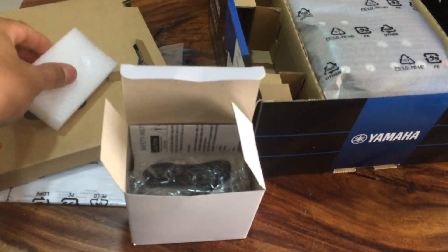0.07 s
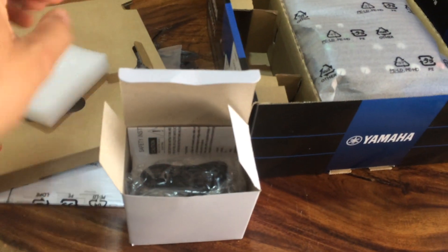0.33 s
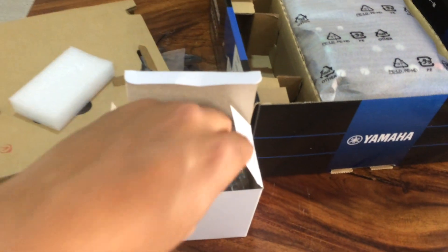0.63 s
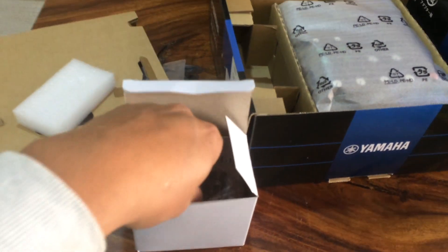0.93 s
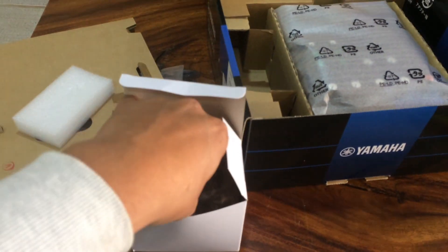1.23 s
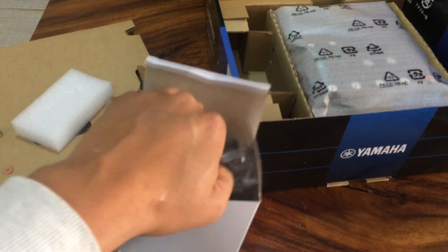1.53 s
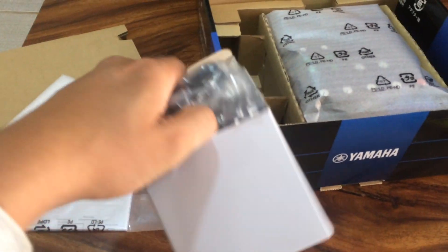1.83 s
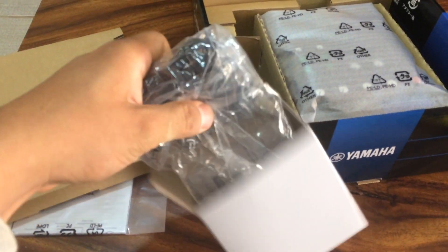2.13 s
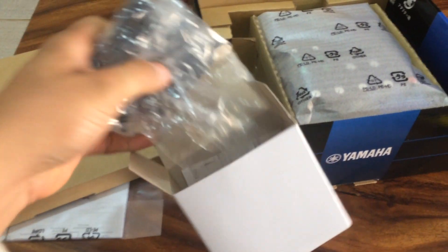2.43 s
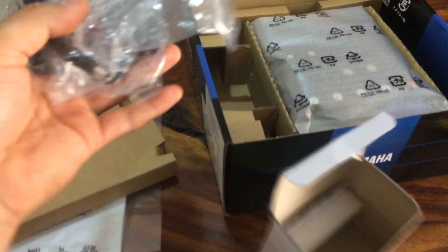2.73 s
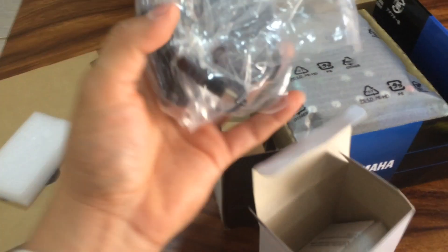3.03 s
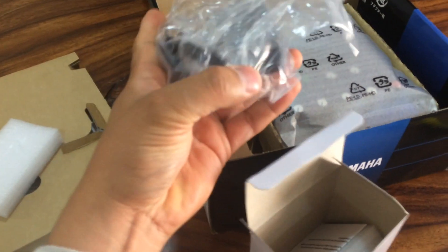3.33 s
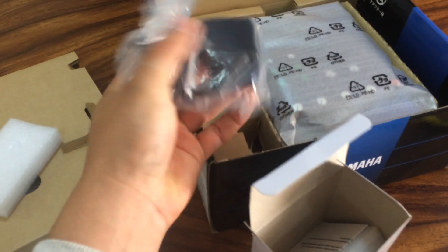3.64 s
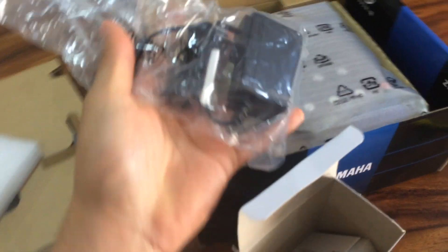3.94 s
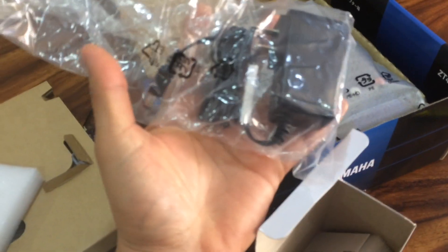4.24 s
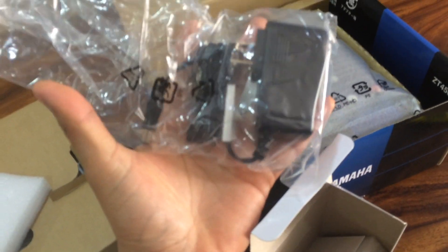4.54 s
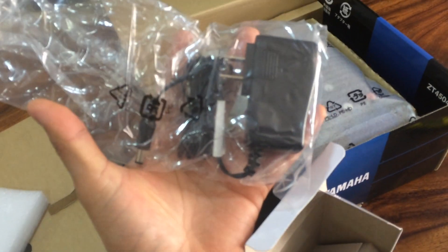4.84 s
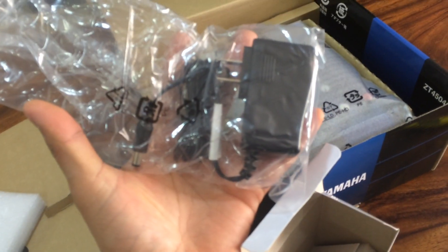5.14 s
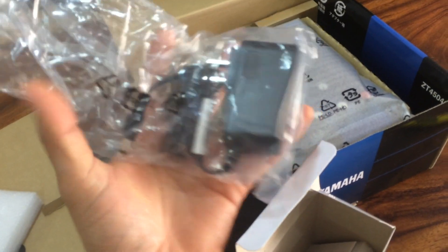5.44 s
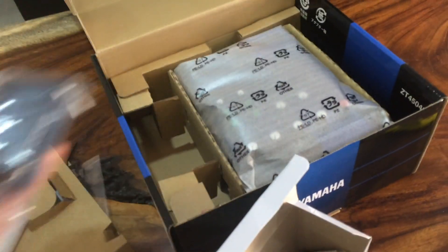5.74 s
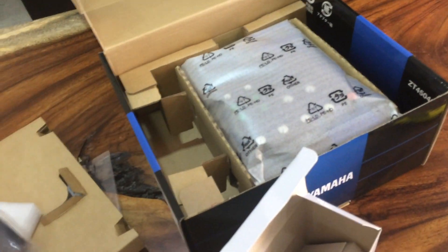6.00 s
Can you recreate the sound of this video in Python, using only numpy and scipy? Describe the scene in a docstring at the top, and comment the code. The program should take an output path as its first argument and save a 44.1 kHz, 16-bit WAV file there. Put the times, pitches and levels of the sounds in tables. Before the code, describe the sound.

Thin plastic crinkles and scrapes out of a cardboard box, the box drops on a table, and the bag crackles in a hand.

```python
"""In a small, quiet room, close to the microphone, a hand pulls a power adapter in a plastic bag out of
a cardboard box. A foam pad hisses through the fingers and the bag rubs along the card by stick-slip
friction. The empty box drops on a wooden table and bounces, each impact exciting the modes of its panels.
The bag is turned over in the palm: its creases buckle, so that the film snaps and crinkles."""
import sys
import numpy as np
from scipy import signal
from scipy.fft import rfft, irfft, next_fast_len
from scipy.io import wavfile
from scipy.ndimage import map_coordinates

SR = 44100
rng = np.random.default_rng(int(sys.argv[2]) if len(sys.argv) > 2 else 0)


def dump(signal):
    """Clip the signal to [-1, 1] and save it as 16-bit WAV at the path in sys.argv[1]."""
    limited = np.clip(np.atleast_2d(signal).T, -1, 1)
    pcm = np.round(limited * 32767).astype(np.int16)
    wavfile.write(sys.argv[1], SR, pcm)


N = 272081


def amp(db):
    """Decibels to amplitude ratio."""
    return 10 ** (np.asarray(db) / 20)


def unit(x):
    """Normalisation to rms 1."""
    return x / np.sqrt(np.mean(x ** 2) + 1e-20)


def one_ms(x):
    """Normalisation to the energy of one millisecond at rms 1."""
    return x * np.sqrt(SR / 1000 / (np.sum(x ** 2) + 1e-20))


def along(points, hz):
    """Interpolation of (frequency_hz, value) points on a logarithmic frequency axis."""
    frequencies, values = np.transpose(points)
    return np.interp(np.log(hz + 1), np.log(frequencies + 1), values)


def add(track, start_s, sound):
    """Superposition: a sound is summed into the track from start_s on."""
    part = track[max(round(start_s * SR), 0):][:len(sound)]
    part += sound[:len(part)]


def wobble(knots_per_s):
    """Smooth random modulation: a spline through Gaussian values."""
    knots = rng.standard_normal(int(N * knots_per_s / SR) + 4)
    return map_coordinates(knots, [np.arange(N) * knots_per_s / SR])


def colour(x, spectrum, size=4096):
    """Minimum-phase filtering imposes a spectrum causally, so attacks stay sharp."""
    gain = amp(along(spectrum, np.fft.rfftfreq(size, 1 / SR)))
    cepstrum = irfft(np.log(gain + 1e-6))
    cepstrum[1:size // 2] *= 2
    cepstrum[size // 2 + 1:] = 0
    return signal.fftconvolve(x, irfft(np.exp(rfft(cepstrum))))[:len(x)]


def resonate(x, hz, q):
    """Two identical resonators in cascade give steep skirts; q is held at 0.6 or more."""
    b, a = signal.iirpeak(min(hz, SR / 4), max(q, .6), fs=SR)
    return signal.lfilter(b, a, signal.lfilter(b, a, x))


def blow(hz, q, shiver, decay_s):
    """Transient response of a resonance to an impulse and a shiver of decaying noise."""
    t = np.arange(SR // 25) / SR
    push = resonate(1e-9 + (t == 0), hz, q)
    after = resonate(rng.standard_normal(len(t)) * np.exp(-t / decay_s), hz, q)
    return one_ms(one_ms(push) + shiver * one_ms(after))


def grains(per_s, hz, scatter, cycles, spread_db, size=160):
    """Shot noise: damped ticks at random moments, most weak and a few strong, at rms 1."""
    moment, tuning, chance = np.hsplit(rng.random((int(per_s * N / SR), 3)), 3)
    pitch_hz = np.clip(hz * np.exp(scatter * (2 * tuning - 1)), 100, SR / 2.5)
    strength = amp(spread_db * np.minimum(-np.log(chance + 1e-9), 4))
    turns = pitch_hz * np.arange(size) / SR
    ticks = strength * np.sqrt(pitch_hz) * np.sin(2 * np.pi * turns) * np.exp(-turns / cycles)
    where = (moment * N).astype(int) + np.arange(size)
    return unit(np.bincount(where.ravel(), ticks.ravel(), N)[:N])


def effort(moves, column):
    """Level envelope in dB: each move swells, eases and decays exponentially; the strongest leads."""
    swell_db_per_s, ease_db_per_s, release_db_per_s = 330, 4.5, 170.5
    t, db = np.arange(N) / SR, np.full(N, -140.)
    for start_s, length_s, *levels_db in moves:
        swell = swell_db_per_s * np.maximum(start_s - t, 0)
        ease = ease_db_per_s * np.clip(t - start_s, 0, length_s)
        release = release_db_per_s * np.maximum(t - start_s - length_s, 0)
        db = np.maximum(db, levels_db[column] - swell - ease - release)
    return db


def room_air():
    """Stationary noise, strongest in the bass, forms a faint background."""
    # background spectrum: frequency_hz, gain_db
    spectrum = [(15, -25.5), (25, -17), (55, -3.5), (100, -5), (165, -1.5), (210, -7), (290, -13),
                (450, -16.5), (650, -19), (1000, -20), (1900, -24), (2500, -28.5), (8000, -38.5),
                (16000, -43)]
    return amp(-67.5) * unit(colour(rng.standard_normal(N), spectrum))


def reverberation(x):
    """A diffuse field decays exponentially, each frequency at its own rate."""
    # reverberation times of the room: frequency_hz, t60_s
    decay_times = [(150, 0.65), (700, 0.8), (2200, 0.69), (6000, 0.69), (14000, 0.53)]
    hz, t, bands = signal.stft(rng.standard_normal(SR // 2), SR, nperseg=256)
    decay = amp(-60 * t / along(decay_times, hz)[:, None])
    tail = signal.istft(bands * decay, SR, nperseg=256)[1]
    return signal.fftconvolve(x, tail / np.linalg.norm(tail))[:N]


def early_reflections(x, count=24):
    """Table and boxes reflect within 1-19 ms; a new pattern every 0.2 s stands for the hand's motion."""
    echoes, hop = np.zeros(N), SR // 5
    for start in range(0, N, hop):
        distance = rng.random(count)
        delays = (SR * (.001 + .018 * distance)).astype(int)
        taps = np.bincount(delays, rng.standard_normal(count) * np.exp(-1.6 * distance))
        taps = np.convolve(taps, np.ones(2))  # softens the treble
        add(echoes, start / SR, signal.fftconvolve(x[start:start + hop], taps / np.linalg.norm(taps)))
    return echoes


def foam_hiss():
    """Sliding friction of foam on skin and card gives a fine, high hiss."""
    # slides of the pad out of the fingers: start_s, length_s, level_db
    slides = [(.055, 0.029, -58.5), (.13, 0.14, -63.5), (.43, 0.019, -70.5)]
    # spectrum of rubbed foam: frequency_hz, gain_db
    spectrum = [(700, -30), (1600, -2.5), (2300, -3.5), (3000, 2), (3800, -2.5), (6500, -2), (11000, -6.5),
                (16000, -3)]
    cells = rng.standard_normal(N) * amp(4.5 * wobble(250))
    return amp(effort(slides, 0)) * unit(colour(cells, spectrum))


def card_rub(rub_db, flex_db):
    """Stick-slip friction: film catches and slips on the card, and the flexing box walls rumble."""
    # spectrum of scraped card: frequency_hz, gain_db
    card_spectrum = [(180, -28), (330, -3), (490, -8), (680, -2), (780, -4.5), (900, 1.5), (1100, -5.5),
                     (1380, 2.5), (1800, -4), (2300, -6.5), (3500, -6), (6000, -23), (12000, -43)]
    # spectrum of the flexing walls: frequency_hz, gain_db
    wall_spectrum = [(25, -30.5), (60, -9.5), (140, -3), (220, -2.5), (330, -2.5), (450, -3.5), (700, -10),
                     (1400, -46)]
    slips = grains(per_s=1300, hz=1677, scatter=1.08, cycles=1.0, spread_db=5.5)
    friction = slips + 0.71 * rng.standard_normal(N)
    scrape = unit(colour(friction, card_spectrum) * amp(wobble(60)))
    rumble = unit(colour(rng.standard_normal(N), wall_spectrum) * amp(2.9 * wobble(30)))
    return amp(rub_db - 1.7) * scrape + amp(flex_db + 3.5) * rumble


def box_knocks():
    """Impact excitation: each blow thuds and rings the box's damped modes at new strengths."""
    # blows on cardboard and table: start_s, level_db, thud_hz, ring_re_thud_db
    impacts = [(0.1227, -34, 700, -13), (.124, -40.5, 230, -10), (.403, -49.5, 700, -10),
               (.471, -54.5, 756, -14), (.765, -56, 900, -7), (.896, -41, 210, -6.5),
               (1.372, -41, 850, -18), (1.517, -37.5, 765, -12), (1.629, -37.5, 150, -14),
               (1.718, -32.5, 650, -9.5), (1.746, -30, 308, -12), (1.748, -29.5, 680, -11.5),
               (1.8238, -34.5, 565, -5), (2.24, -41, 131, -11), (2.3195, -22, 343, -16.5),
               (2.32, -27, 980, -5), (2.369, -34.5, 680, -7), (2.711, -20, 308, 7.5),
               (2.7125, -24, 890, -11), (2.792, -30.5, 330, 1), (2.802, -30, 170, -2),
               (3.872, -31.5, 640, -21), (4.486, -39.5, 610, -31), (5.084, -36.5, 420, -10),
               (5.667, -46, 550, 1)]
    # free modes of the empty box: pitch_hz, level_db, t60_s
    box_modes = [(135, 0, 0.14), (254, -11.5, 0.11), (361, 3, .16), (420, -12, .054), (637, -14.5, .12),
                 (717, -2, 0.14), (934, -2, .13), (1000, -5.5, .11), (1240, -12, .1), (1340, -13, .047),
                 (1572, -23, 0.086), (2400, -14.5, 0.03)]
    track, t = np.zeros(N), np.arange(SR // 4) / SR
    hz, mode_db, t60_s = np.transpose(box_modes)[:, :, None]
    modes = amp(mode_db - 60 * t / t60_s) * np.sin(2 * np.pi * hz * t)
    # the table soaks up most of the swing while the box still touches it
    contact = (1 - np.exp(-t / 0.0024)) * (0.1 + np.exp(-t / 0.0078))
    for start_s, db, thud_hz, ring_db in impacts:
        strengths = amp(0.6 * rng.standard_normal(len(modes))) * rng.choice([-1, 1], len(modes))
        # card yields, so the contact is soft and has little treble
        lowpass = signal.butter(2, min(1.2 * thud_hz, SR / 4), fs=SR)
        thud = signal.lfilter(*lowpass, blow(thud_hz, q=0.79, shiver=1.0, decay_s=0.0056))
        add(track, start_s, amp(db) * one_ms(thud))
        add(track, start_s, amp(db + ring_db) * one_ms(strengths @ modes * contact))
    return track


def film_crinkle(film_db):
    """Crackling noise: tiny creases give way in clumps, over the friction hiss of film on film."""
    # spectrum of the plastic film: frequency_hz, gain_db
    spectrum = [(400, -20), (1100, -9), (2000, 0.5), (3000, -2.5), (4500, -1), (7000, -5), (11000, -6),
                (16000, -11.5)]
    ticks = grains(per_s=900, hz=4270, scatter=0.9, cycles=1.1, spread_db=4.0)
    sliding = unit(rng.standard_normal(N) * amp(2.1 * wobble(40)))
    clumps = ticks * amp(3.2 * wobble(90))
    return amp(film_db + 0.3) * unit(colour(clumps + .6 * sliding, spectrum))


def small_creases(film_db):
    """Buckling under strain: small creases flip at uneven moments, louder as the film is worked harder."""
    creases_per_s, strain_build_s = 30, 0.016
    still_db, busy_db = -70, -50.5  # film levels: at rest below the first, busy at the second
    track, count = np.zeros(N), int(creases_per_s * N / SR)
    moments = (np.arange(count) + rng.random(count)) / count * N / SR
    for start_s, (strength, pitch, bright) in zip(moments, rng.standard_normal((count, 3))):
        earlier_db = film_db[int(max(start_s - strain_build_s, 0) * SR)]
        moving_db = min(film_db[int(start_s * SR)], earlier_db)
        if moving_db > still_db:
            db = -37 + 0.71 * (moving_db - busy_db) + 3 * strength
            ring = blow(2100 * np.exp(.3 * pitch), q=1.1, shiver=0.98, decay_s=0.0022)
            crack = blow(7300, q=0.6, shiver=1.3, decay_s=.0012)
            add(track, start_s, amp(db) * (ring + amp(-12 + 5.5 * bright) * crack))
    return track


def snaps_and_clicks(film_db, neighbours=3):
    """Impulsive excitation: a buckling crease or a knock on card gives a bright crack and a brief ring."""
    # the loudest crisp clicks, film creases snapping and card being knocked:
    # start_s, level_db, pitch_hz, q, crack_re_ring_db
    clicks = [(0.1336, -60, 1000, 2.1, 18), (.757, -53, 1410, 1, -5.5), (.77, -46.5, 1170, .7, -22),
              (0.9456, -40.5, 1410, 1, -24), (.9499, -35, 1710, .45, -4), (1.0595, -28.5, 2300, 1.6, -4.5),
              (1.08, -42, 2050, .5, 1), (1.1609, -36, 2100, .5, -3.5), (1.2265, -36.5, 1860, 0.54, -6),
              (1.294, -35.5, 4270, 3.9, -2), (1.3827, -33, 960, 1.4, -3.5), (1.514, -32.5, 1860, .5, -8),
              (1.5336, -33, 1290, 0.65, -18), (1.607, -43.5, 1580, 1.2, 11),
              (1.6735, -34.5, 2626, 0.46, -16), (1.6825, -33.5, 1520, 5.8, -9.5),
              (1.7642, -28, 2870, .5, -6.5), (1.8435, -33.5, 2500, 0.71, -17),
              (1.9827, -31.5, 1830, 1.6, -15), (2.0047, -30.5, 1680, 1, -17), (2.0507, -28.5, 1400, 1.4, 7),
              (2.0834, -38, 1160, .9, 0), (2.1843, -30, 3260, 0.68, -13), (2.2625, -30.5, 1710, .5, -3.5),
              (2.2753, -33, 1250, .5, -3), (2.4125, -49.5, 1000, .6, 13), (2.4634, -32.5, 3100, 2.4, -15),
              (2.631, -34.5, 2700, .5, -5), (2.7133, -23.5, 2400, 1.3, -6), (2.7938, -39, 1014, .5, -3),
              (2.8049, -31.5, 1540, .5, -10.5), (2.9662, -31, 2360, .7, -12), (2.9766, -30, 1910, 1.5, -11),
              (3.0169, -43, 2940, .6, -19), (3.0833, -35.5, 2172, 0.59, -16), (3.101, -39.5, 3880, 1, -8),
              (3.271, -35.5, 4260, .9, -25), (3.3507, -32, 2400, 2.1, -6), (3.4729, -33, 2970, .5, -21.5),
              (3.6683, -31, 3200, 0.92, -9), (3.7075, -32, 3260, .7, -5.5), (3.717, -32, 2550, 2.7, 4.5),
              (3.7518, -19.5, 2817, .5, -13.5), (3.789, -30, 1900, .5, -9), (3.8101, -28, 2570, .5, -4.5),
              (3.8216, -28.5, 1920, .5, -3), (3.855, -29, 4230, 1.7, -16), (3.8735, -28, 2100, .5, -4.5),
              (3.896, -28, 2100, 0.61, -6), (3.929, -26, 2700, 0.7, -15), (4.0877, -37.5, 2910, .7, -6.5),
              (4.1173, -36, 1400, .5, -19), (4.144, -40.5, 1290, .8, -22), (4.2872, -41.5, 1412, .5, -16.5),
              (4.313, -40.5, 1210, .5, -22.5), (4.3243, -40, 1760, 0.71, -13),
              (4.3895, -38.5, 1780, .5, -12.5), (4.47, -40, 2500, 1.3, -30),
              (4.475, -35.5, 1620, 0.92, -28), (4.4883, -40, 1330, .5, -17), (4.6447, -28, 3150, 1.24, -9),
              (4.7684, -28, 2030, 1.9, -27.5), (5.0848, -35, 2700, 1.4, -16.5),
              (5.09, -37, 1220, 0.53, -14.5), (5.519, -49, 1570, 3, -19), (5.558, -38.5, 2250, .6, -25),
              (5.5924, -32, 3860, 3.1, -14), (5.6773, -33, 1630, 0.54, -2.5), (5.695, -34, 2217, 1.2, -28),
              (5.764, -33.5, 1910, .5, 0), (5.805, -30.5, 2400, 0.68, -24), (5.854, -31.5, 1910, .5, -6),
              (5.8877, -31, 1730, 0.37, -19), (5.996, -32, 1840, 0.53, -27), (6.1013, -39, 3135, 0.54, -2),
              (6.1167, -31.5, 3370, .9, -14)]
    track = np.zeros(N)
    for start_s, db, hz, q, crack_db in clicks:
        moving_db = film_db[int(start_s * SR)]
        # a lone click is clean; one in moving film shivers on
        shiver = np.interp(db - moving_db, [14, 27], [.95, .45])
        ring = blow(hz, q, shiver, decay_s=.0019)
        crack = blow(7300, q=0.6, shiver=1.9 * shiver, decay_s=0.0012)
        add(track, start_s, amp(db + .5) * (ring + amp(crack_db) * crack))
        # while the film is moving, neighbouring creases give way just after
        neighbour_db = min(db - 14, moving_db + 15.5)
        for lag, pitch, strength in rng.standard_normal((neighbours, 3)):
            tick = blow(hz * np.exp(.35 * pitch), q=1.1, shiver=.9, decay_s=.003)
            add(track, start_s + .0055 * abs(lag), amp(neighbour_db + 1.6 * strength) * tick)
    return track


def scene():
    """Superposition of the direct sound of the handling, its reflections and the background."""
    # the hand gropes for the bag, draws it out, turns it over, lets it relax and carries it off:
    # start_s, length_s, film_db, rub_db, flex_db
    moves = [(.925, 0.03, -65, -58, -70), (1.08, .03, -58.5, -52.5, -67), (1.21, 0.033, -59.5, -54, -75),
             (1.31, .02, -57.5, -55, -78), (1.38, 0.22, -50, -45.5, -69.5), (1.66, 0.16, -56, -48.5, -65),
             (1.87, 0.29, -51, -47.5, -70), (2.2, .14, -47, -46.5, -55.5), (2.38, .03, -54.5, -53, -61),
             (2.5, 0.073, -53, -57.5, -61), (2.61, 0.091, -51.5, -55, -61), (2.74, .1, -57.5, -55.5, -50.5),
             (2.96, 0.014, -59.5, -53, -64), (3.03, 0.25, -60, -62, -68), (3.32, .2, -58, -60.5, -65.5),
             (3.64, 0.067, -48, -53, -62.5), (3.73, 0.079, -41.5, -46.5, -59),
             (3.85, 0.048, -49.5, -49.5, -62), (4.08, .3, -69, -67, -71), (4.63, 0.027, -68, -69, -80.5),
             (5.46, .06, -77, -72, -79.5), (5.55, 0.066, -68, -64, -75.5), (5.69, 0.23, -55.5, -56, -72),
             (5.98, 0.019, -48.5, -52, -73), (6.07, 0.086, -55, -56.5, -68.5)]
    film_db, rub_db, flex_db = [effort(moves, column) for column in range(3)]
    crackle = snaps_and_clicks(film_db) + small_creases(film_db) + film_crinkle(film_db)
    direct = crackle + card_rub(rub_db, flex_db) + foam_hiss() + box_knocks()
    air = room_air()
    return (direct + amp(-15) * early_reflections(direct) + amp(-18) * reverberation(direct) + air)[None]


def record(dry):
    """Filtering: less deep bass, a slight hollow near 490 Hz from the table's reflection, a top limit."""
    # overall tone of the scene: frequency_hz, gain_db
    tone = [(20, -5.5), (60, 3), (400, -1.5), (490, -2.0), (610, 0.5), (3000, -1.5), (8000, 2.24),
            (11500, 0.66), (13500, 0.5), (16000, -3.5)]
    band_limit_hz = 16100
    size = next_fast_len(N + SR // 2)
    hz = np.fft.rfftfreq(size, 1 / SR)
    gain = amp(along(tone, hz)) * (hz < band_limit_hz)
    return irfft(rfft(dry, size) * gain, size)[:, :N]


dry = scene()
out = record(dry)
dump(out)
```